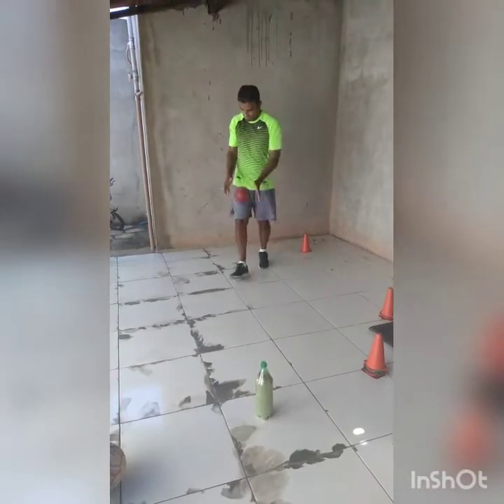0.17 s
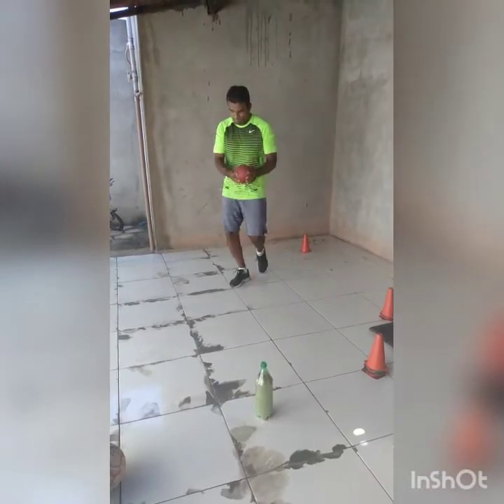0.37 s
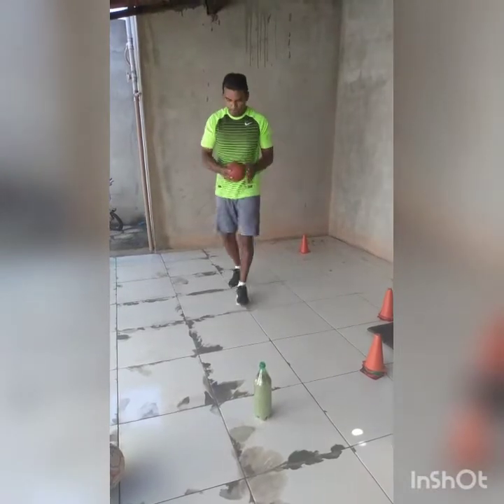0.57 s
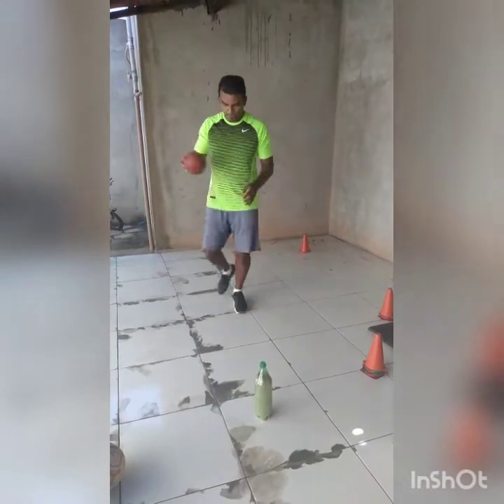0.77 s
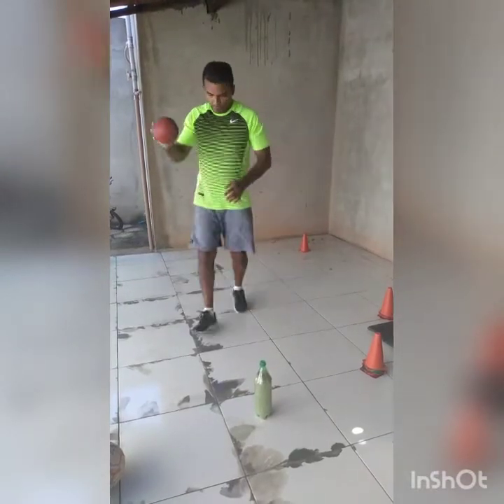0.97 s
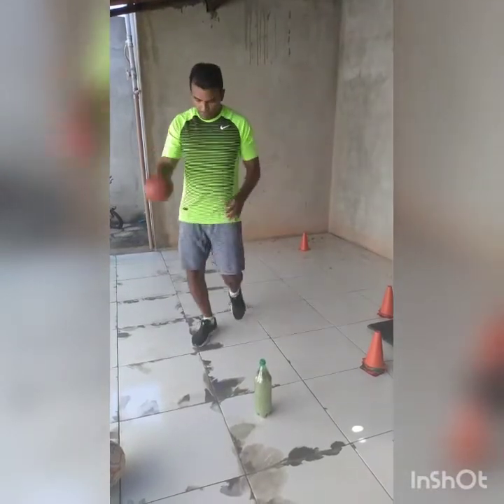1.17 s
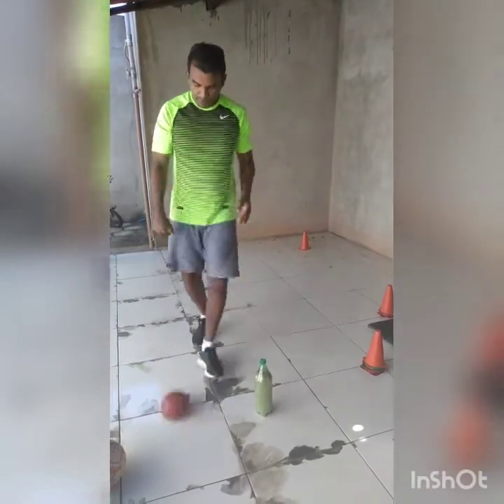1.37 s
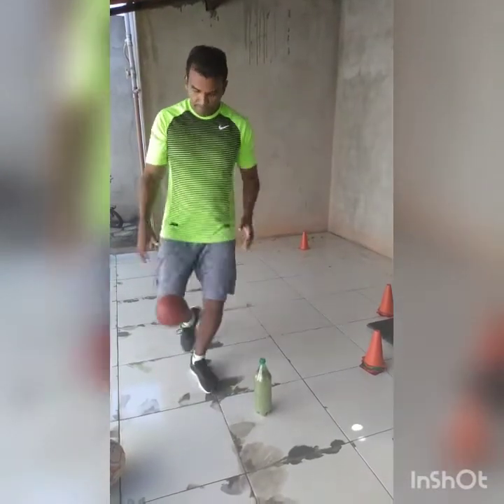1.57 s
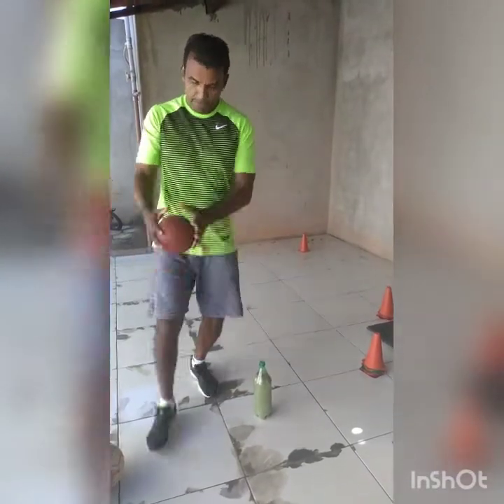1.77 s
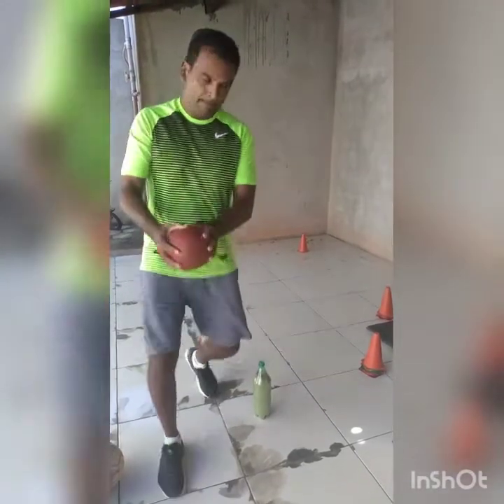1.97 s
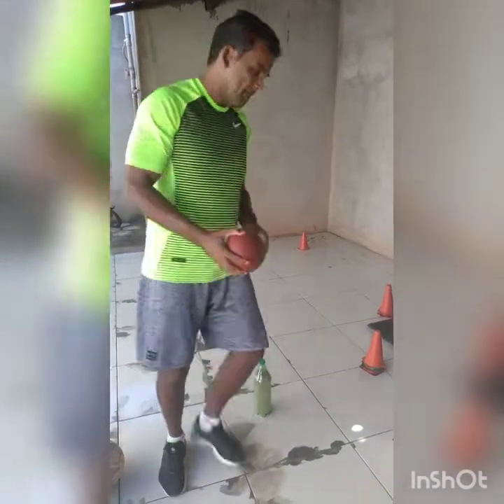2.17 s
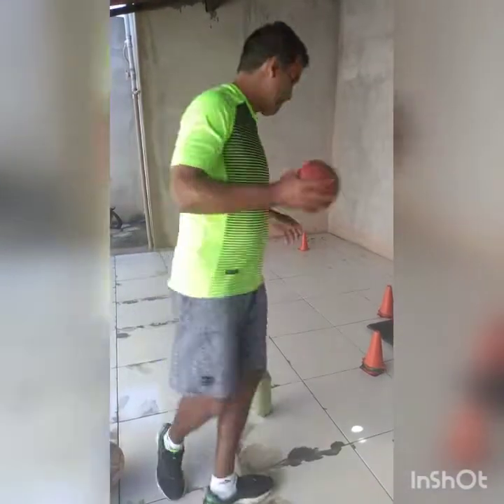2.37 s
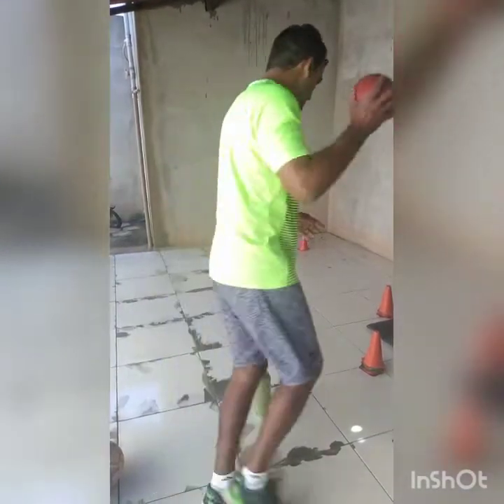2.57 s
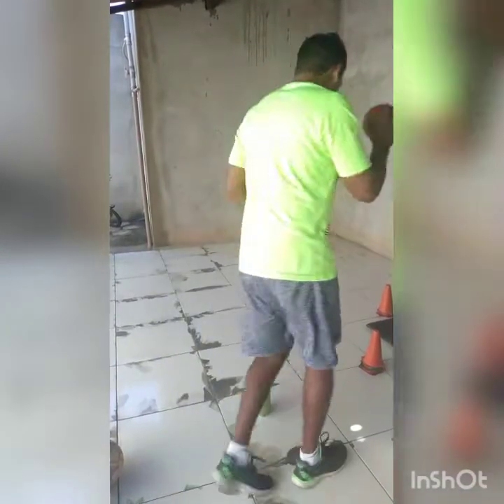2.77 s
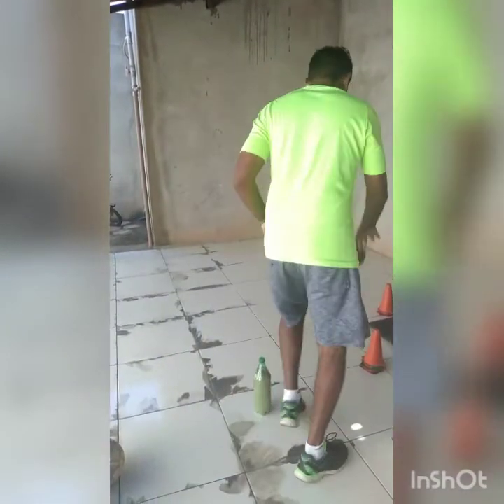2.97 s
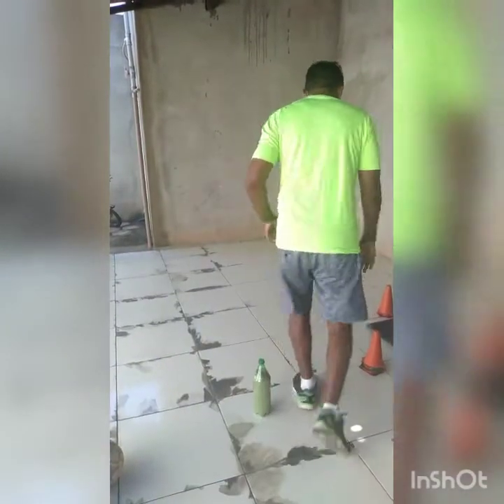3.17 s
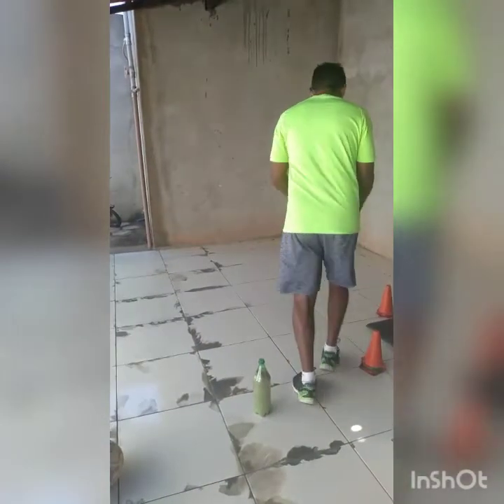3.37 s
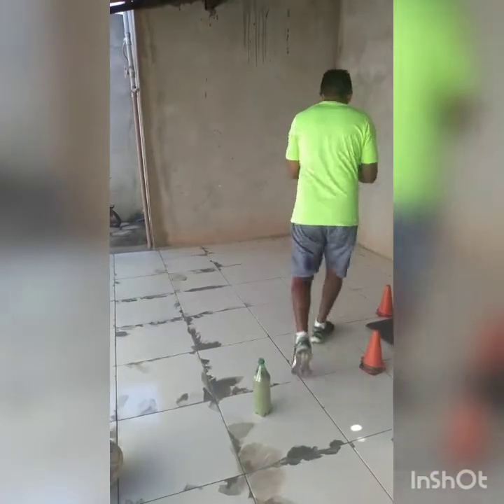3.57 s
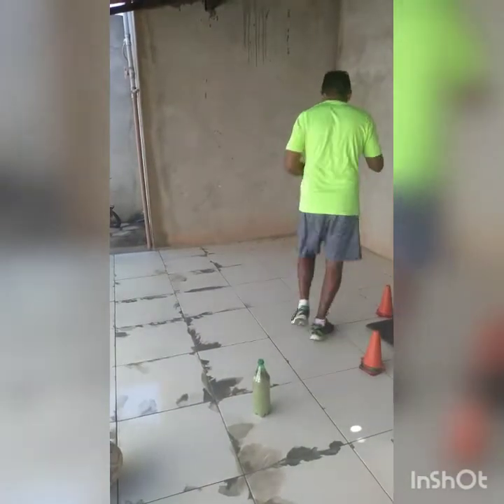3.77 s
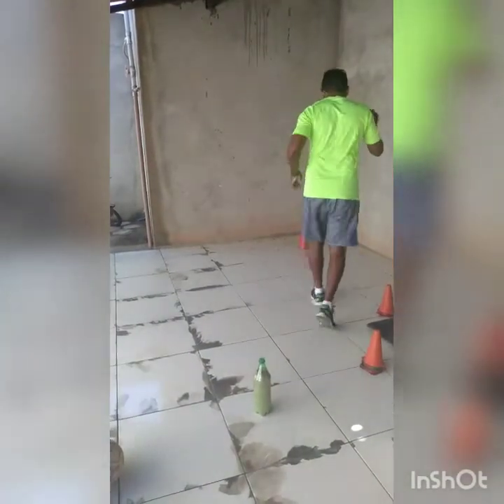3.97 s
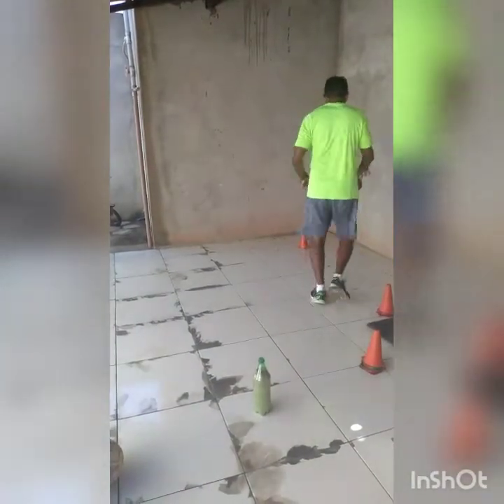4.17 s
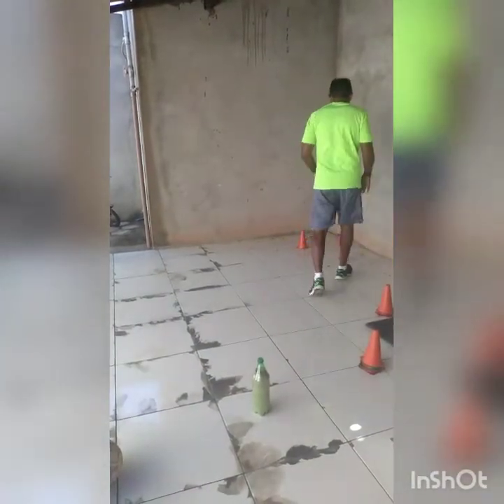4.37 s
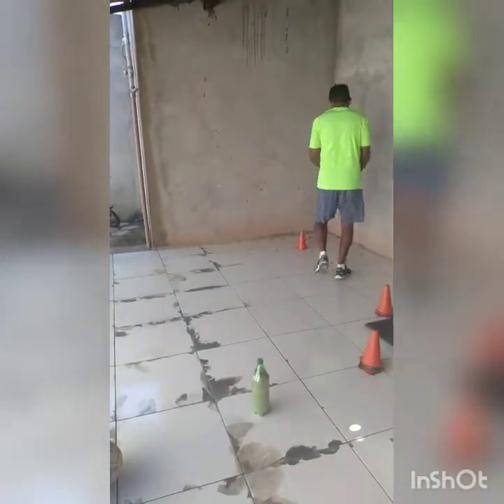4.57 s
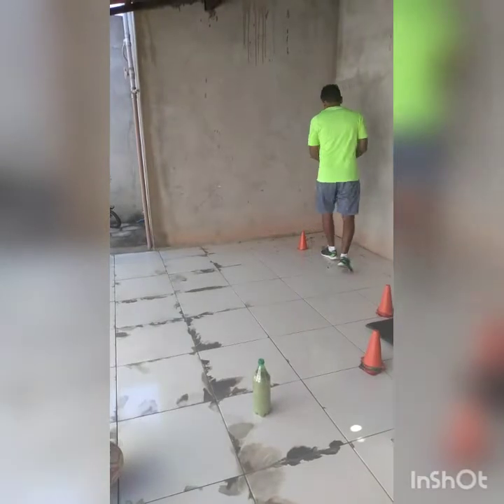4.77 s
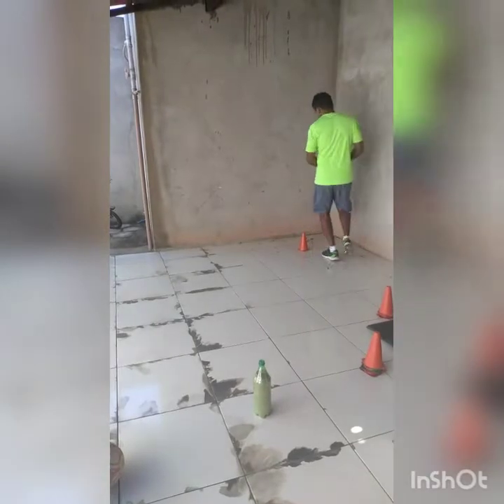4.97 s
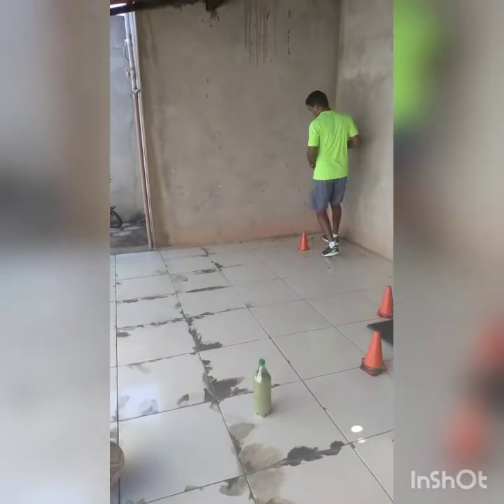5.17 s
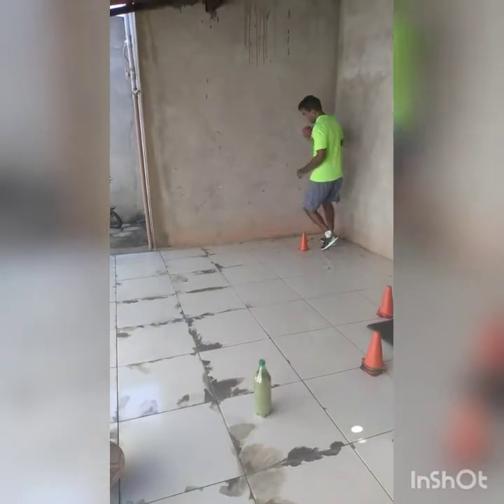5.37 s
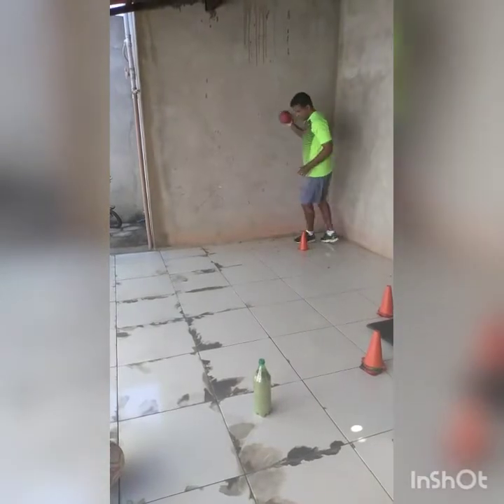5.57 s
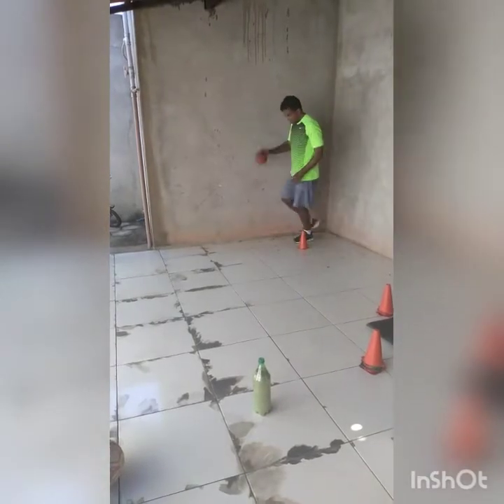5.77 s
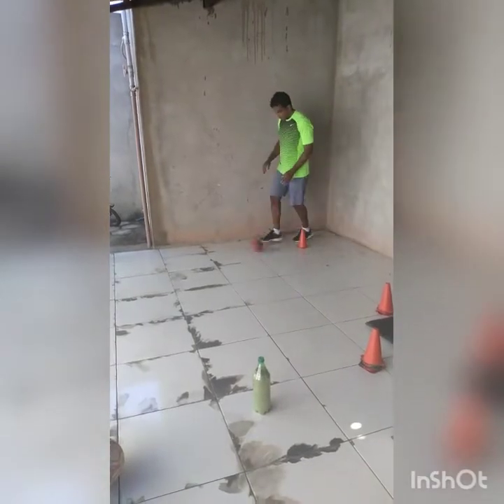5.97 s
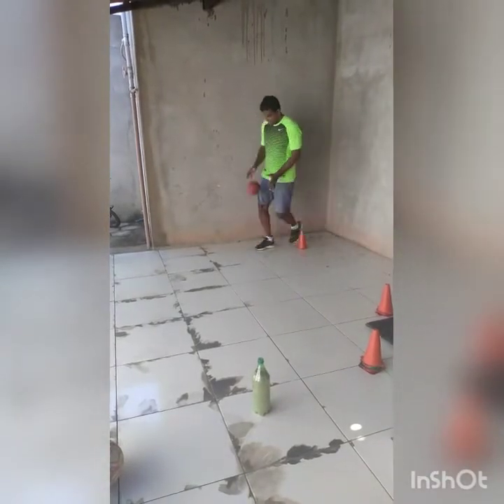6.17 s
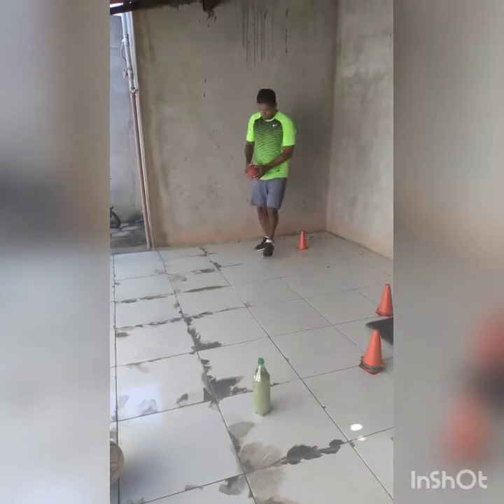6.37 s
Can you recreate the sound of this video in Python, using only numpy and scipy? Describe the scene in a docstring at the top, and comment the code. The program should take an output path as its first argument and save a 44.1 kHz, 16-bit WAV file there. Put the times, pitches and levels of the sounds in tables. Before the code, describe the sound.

A bare tiled room with hard plaster walls, heard by a stationary phone in wide stereo. At 0 s the ringing tail of a bounce just before the start dies away over faint low outdoor rumble and slight hiss. Tiny foot and hand taps come around 0.2, 0.6 and 1.0 s, then a soft scuff. At 1.4 s the ball hits loudest and close, a dull, full thud with a ringing room. Quiet steps and stuttering shoe drags follow from 1.75 to 3 s, with a faint hollow gliding tone near 2.8 s. At 3.1 s a sharper, crackly bounce; scuffs near 3.5 and 3.9 s. At 4.3 s a bounce with a strong hollow thump and bright wall echo, then shuffling and sparse steps as the player recedes. A gritty scuff at 5.6 s, a weaker, distant, reverberant bounce at 6.0 s, and small taps and scuff at 6.2 s before the end at about 6.4 s.

```python
"""A small ball bounces on a tiled floor in a bare, hard room: each hit is a dull pull, a crackle of
skin on tile and a ringing answer from the walls that grows as the player walks away.
Between bounces soles and palms tap in short uneven contacts and soles scuff as stuttering noise.
Faint hollow tones glide by over a drifting outdoor rumble. A phone listens through two ports a
hand apart and widens the picture by subtracting from each port a delayed copy of the other."""
import sys
import numpy as np
from scipy import signal
from scipy.fft import rfft, irfft, next_fast_len
from scipy.io import wavfile
from scipy.ndimage import uniform_filter1d

SR = 44100
rng = np.random.default_rng(int(sys.argv[2]) if len(sys.argv) > 2 else 0)


def master_out(mix):
    """Clip the mix to full scale and print it as 16-bit PCM to the path in sys.argv[1]."""
    frames = np.transpose(np.atleast_2d(mix))
    ceiling = np.clip(frames, -1, 1)
    pcm = np.round(ceiling * 32767).astype(np.int16)
    wavfile.write(sys.argv[1], SR, pcm)


N = 283122

# Rubber dragging on tile, as a relative spectrum. Each row: frequency in Hz, level in dB.
DRAG_SPECTRUM = [(60, -1.5), (200, 0), (500, -6), (900, 1.5), (1600, -8), (2700, -9), (5000, -25),
                 (15000, -38)]
# Fine grit and crackling skin, as a relative spectrum. Each row: frequency in Hz, level in dB.
GRIT_SPECTRUM = [(500, -32.5), (2500, 4.5), (5500, 0), (8000, -1), (11500, -1), (14000, -12)]
PORT_GAP_S = 0.000475  # sound's travel time between the ports
LEAD = SR // 2  # samples played before the start, so that earlier sounds can ring in


def bounces(mix):
    """The ball flattens in a fraction of a millisecond: a dull pull, with the crackle of its skin on the tile."""
    # Hits of the ball. Each row: start in seconds, level in dB, skin crackle in dB above that level,
    # crackle decay in ms, treble tilt of the room's share in dB per octave, bass lift in dB,
    # thump pitch in Hz, thump level in dB, wall echo delay in ms, wall echo level in dB.
    bounce_rows = [(-.13, -5, -2, 1.2, 1, -7.5, 390, -22, 18, -12),
                   (1.3859, -2.5, -2.5, 2.6, 0.5, -7.5, 421, -20, 25, -23),
                   (3.0965, -7, 9, 0.4, -0.5, -3.5, 530, -29, 15, -19),
                   (4.3006, -10, 12, 2.2, 2, -5, 455.5, -1, 24.5, 11.5),
                   (5.9813, -13, 4.5, 1.4, 0, -2, 277, -5.5, 2, 6)]
    # Tone of the ball. Each row: frequency in Hz, level in dB.
    ball_spectrum = [(30, -9), (65, 10), (150, 9), (400, 3.5), (1000, 0), (2000, 0), (3500, -6),
                     (6000, -8.5), (10000, -11), (15000, -26)]
    body_per_skin = 0.12  # a bounce that crackles more also has more body, dB per dB
    even_m = 3.58  # distance at which the room answers a bounce at 0 dB
    thump_ms_at_0m, thump_ms_per_m = 21, -0.85  # the thump comes sooner near the far wall
    lag_ms_at_1m = 0.23  # far port lag, shrinking with distance
    pull_tilt_db = -1.92  # per octave

    out = 0 * mix
    crackle_t_ms = np.arange(200) / SR * 1000
    for s, db, skin_db, crackle_ms, tilt_db, bass_db, thump_hz, thump_db, echo_ms, echo_db in bounce_rows:
        m = distance(s)
        body_db = body_per_skin * skin_db
        lag_ms = lag_ms_at_1m / m

        pull = -np.convolve(pulse(ball_spectrum, pull_tilt_db, bass_db, body_db), np.hanning(9) / 4)
        add(out, s - 12 / SR, direct(gain_of(db) * pull, lag_ms))

        sparks = rng.standard_normal(200) * np.exp(-crackle_t_ms / crackle_ms)
        crackle = np.convolve(sparks, pulse(GRIT_SPECTRUM)[:64])
        crackle /= np.linalg.norm(crackle)
        add(out, s - 16 / SR, direct(gain_of(db + skin_db) * crackle, lag_ms))

        into_room = -gain_of(db) * pulse(ball_spectrum, tilt_db, bass_db, body_db)
        walls = thump_ms_at_0m + thump_ms_per_m * m, thump_db, thump_hz, echo_ms, echo_db
        add(out, s, room(into_room, 20 * np.log10(m / even_m), walls, size=SR))
    return out


def taps(mix):
    """Each landing is a few milliseconds of uneven contact, with a thud of its own pitch."""
    # Soles and palms landing. Each row: start in seconds, level in dB, thud pitch in Hz,
    # treble tilt in dB per octave.
    tap_rows = [(0.228, -43.5, 186, -3.5), (0.29, -40.5, 184, -6.5), (0.605, -43, 292, -3),
                (0.623, -39, 750, -3.5), (1.007, -41, 210, -2.5), (1.027, -43, 910, -0.5),
                (1.036, -34.5, 740, -2), (1.759, -47.5, 511, -7), (1.839, -48, 152, -4.5),
                (1.863, -38, 530, -2), (2.207, -43, 524, -0.5), (2.298, -44, 307, -4), (2.36, -54, 900, -1),
                (2.698, -36.5, 676, 0), (2.72, -40.5, 250, -2), (2.907, -46.5, 899, -2),
                (3.005, -58, 905, -20), (3.34, -46, 323, -2.5), (3.93, -49.5, 167, -7),
                (3.957, -39.5, 453, -3), (4.635, -57, 498, -8), (4.77, -48.5, 789, -2.5),
                (5.197, -41.5, 352, -2), (5.563, -54.5, 221, -4), (5.612, -51, 840, 0.5),
                (6.228, -39, 760, -5), (6.257, -41.5, 463, -5)]
    # Tone of a landing. Each row: frequency in Hz, level in dB.
    sole_spectrum = [(40, -26.5), (100, -6), (300, -2), (1000, 3.5), (2600, 5.5), (5000, -5.5),
                     (9000, -12.5), (15000, -32.5)]
    thud_db_at_400hz, thud_db_per_octave = 7.5, -2.5  # deeper thuds stand out more
    bass_db, contact_ms = 7.5, 2.7
    tick_db, tick_tilt_db = -5.5, 3.5  # relative to the landing; tilt per octave
    room_db_at_0m, room_db_per_m = 2.03, 0.96

    out = 0 * mix
    fade = np.exp(-np.arange(600) / SR * 1000 / contact_ms)
    for s, db, thud_hz, tilt_db in tap_rows:
        thud_db = thud_db_at_400hz + thud_db_per_octave * np.log2(thud_hz / 400)
        contact = (1.06 + rng.standard_normal(600)) * fade
        contact /= np.linalg.norm(contact)
        knock = gain_of(db) * pulse(sole_spectrum, tilt_db, bass_db, thud_db, thud_hz)
        # the dry rubber tick is heard only on the straight path
        tick = gain_of(db + tick_db) * pulse(DRAG_SPECTRUM, tick_tilt_db)
        add(out, s, direct(np.convolve(knock + tick, contact)))
        add(out, s, room(knock, room_db_at_0m + room_db_per_m * distance(s)))
    return out


def scuffs(mix):
    """Stuttering friction under a smooth stroke: dull rubber drag plus fine grit."""
    # Soles dragged over the tiles. Each row: start in seconds, length in ms, rubber drag in dB rms,
    # grit hiss in dB rms (both before the path gains).
    scuff_rows = [(0.272, 36, -69, -58), (.86, 86, -64, -78), (1.161, 480, -61, -66.5),
                  (1.752, 21, -54, -61.5), (1.928, 260, -58.5, -63), (2.22, 140, -63.5, -65.5),
                  (2.611, 130, -70.5, -67.5), (2.7, 77, -50, -58), (2.819, 470, -59.5, -62),
                  (3.081, 15, -40, -67.5), (3.428, 56, -55.5, -60), (3.498, 76, -51, -88),
                  (3.93, 140, -54, -68), (4.071, 480, -61, -70), (4.617, 56, -67, -72.5),
                  (5.554, 40, -69, -56.5), (5.594, 39, -56, -50), (5.702, 290, -77, -69.5),
                  (6.22, 52, -49, -51.5)]
    rise_ms, rise_share = 12, .11  # a stroke rises for a fixed time plus a share of its length
    stutter_db = 4.6  # rms
    direct_db, room_db = -11.0, -12

    out = 0 * mix
    for s, ms, drag_db, grit_db in scuff_rows:
        u = np.linspace(0, 1, round(ms * SR / 1000))
        drag_noise, grit_noise, slow_noise = rng.standard_normal((3, SR // 2))[:, :len(u)]
        peak_at = np.clip(rise_share + rise_ms / ms, .1, .5)
        swell = np.interp(u, [0, peak_at, 1], [0, np.pi / 2, np.pi])
        stutter = gain_of(stutter_db * evened(uniform_filter1d(slow_noise, 200)))
        stroke = np.sin(swell) ** 0.24 * stutter
        drag = evened(signal.fftconvolve(drag_noise * stroke, pulse(DRAG_SPECTRUM))[:len(u)])
        grit = evened(signal.fftconvolve(grit_noise * stroke, pulse(GRIT_SPECTRUM))[:len(u)])
        rub = gain_of(drag_db) * drag + gain_of(grit_db) * grit
        add(out, s, gain_of(direct_db) * direct(rub))
        add(out, s, room(rub, room_db))
    return out


def whistles(mix, width_hz=35):
    """A wavering tone, half noise, on a gliding pitch."""
    # Faint hollow tones. Each row: start in seconds, length in ms, start pitch in Hz, end pitch in Hz,
    # level in dB (rms before the fade in and out).
    whistle_rows = [(1.755, 78, 492, 590, -69), (2.8, 240, 827, 992, -66.5), (3.62, 99, 889, 865, -70.5),
                    (5.61, 200, 850, 990, -73)]
    out = 0 * mix
    for s, ms, start_hz, end_hz, db in whistle_rows:
        hz = np.linspace(start_hz, end_hz, round(ms * SR / 1000))
        noises = rng.standard_normal((2, SR // 2))
        a, b = uniform_filter1d(noises, round(SR / width_hz))[:, :len(hz)]
        waver = evened(a) + 1j * evened(b) + 1.6  # random drift round a steady tone
        carrier = np.exp(2j * np.pi * np.cumsum(hz) / SR)
        tone = evened((waver * carrier).real) * np.hanning(len(hz)) ** 0.398
        add(out, s, direct(gain_of(db) * tone))
        add(out, s, room(gain_of(db) * tone, -5.5))
    return out


def air(mix):
    """Distant outdoor rumble drifting in through the doorway: coloured noise under a slow random-phase swell."""
    # Tone of the rumble. Each row: frequency in Hz, level in dB.
    air_spectrum = [(25, -23.5), (60, 20.5), (130, 18.5), (300, 7.5), (1000, -3.5), (1600, -6),
                    (3000, -12.5), (6000, -18), (15000, -22.5)]
    # Course of the rumble. Each row: time in seconds, level in dB rms before the swell.
    air_course = [(0, -52), (.5, -61.5), (1.1, -54.5), (2, -62), (2.6, -56.5), (3.7, -57.5), (4.2, -58),
                  (4.95, -67.5), (5.5, -59.5), (5.9, -57), (6.42, -56.5)]
    t = (np.arange(mix.shape[1]) - LEAD) / SR
    swell = 0 * t
    for f in np.geomspace(1.5, 12, 12):
        swell += np.sin(2 * np.pi * (f * t + rng.random())) / np.sqrt(f)
    level_db = np.interp(t, *np.transpose(air_course))
    rumble = evened(diffuse(rng.standard_normal(mix.shape), air_spectrum))
    return gain_of(level_db + 1.2 * evened(swell)) * rumble


def room(x, room_db, walls=None, size=SR // 2):
    """Scattered wall echoes and a tail that fills up, rings in standing waves and dies by band, fast at first."""
    # Colour of the tail. Each row: frequency in Hz, level in dB.
    wall_spectrum = [(40, 18), (300, 10), (700, 5), (2000, 4), (3000, 1.5), (6000, 6), (15000, 13)]
    # Decay of the tail by band. Each row: frequency in Hz, time in seconds to fall 60 dB.
    decay_times = [(60, 0.94), (160, 0.95), (420, 1), (1100, 0.57), (2910, 0.72), (7680, 0.46)]
    # Standing waves between the walls. Each row: frequency in Hz, level in dB before its random spread,
    # time in seconds to fall 60 dB.
    standing_waves = [(66.1, -40, 1.2), (153.1, -40.5, 0.53), (280.5, -41.5, 0.52), (365, -47, 0.6),
                      (432.7, -50.5, 0.69), (480, -50.5, 0.97), (530, -50.5, 0.85), (572.4, -52, 0.48)]
    ring_db, ring_span = 6, 0.19  # lift of standing waves near the thump, and its relative width

    hz, t, z = signal.stft(rng.standard_normal((2, size)), SR, nperseg=256)
    early = 1 + gain_of(-7.5) * np.exp(-t / 0.077)
    fall = gain_of(-60 * t / read(decay_times, hz)[:, None]) * early
    tail = signal.istft(z * fall, SR, nperseg=256)[1][:, :size]
    tail = diffuse(tail / np.linalg.norm(tail[0]), wall_spectrum)

    t = np.arange(size) / SR
    draws = rng.standard_normal((len(standing_waves), 3))
    for (f, db, t60), (spread, phase, split) in zip(standing_waves, draws):
        beating = 1 + 0.37 * np.sin(2 * np.pi * (7.24 * split * t + spread))  # a close neighbour beats with each
        wave_db = db + 2 * spread  # each standing wave randomly stronger or weaker for every sound
        if walls:  # waves near the pitch of the thump ring on
            wave_db += ring_db * np.exp(-(np.log(f / walls[2]) / ring_span) ** 2)
        wave = np.sin(2 * np.pi * (f * t + phase + np.c_[[0, f * PORT_GAP_S]]))
        tail += gain_of(wave_db - 60 * t / t60) * beating * wave

    paths = gain_of(room_db) * tail * (1 - np.exp(-(t / 0.0034) ** 2))
    paths *= np.sqrt(1 - t / t[-1]) * (t < .9 * t[-1])
    if walls:
        thump_ms, thump_db, thump_hz, echo_ms, echo_db = walls
        # evenly spaced low reflections pile up into a short hollow note
        reflections = np.exp(1.4 * np.sin(2 * np.pi * (thump_hz * t + rng.random()))) - 1.55
        thump = np.exp(-((t * 1000 - thump_ms) / 4.7) ** 2) * reflections
        paths += gain_of(thump_db) * thump / np.linalg.norm(thump)
        # rough plaster smears the strongest, bright echo over a few milliseconds
        smear = np.exp(-((t[:2048] * 1000 - echo_ms) / 3.5) ** 2)
        echo = np.diff(rng.standard_normal((2, 2049))) * smear
        paths[:, :2048] += gain_of(echo_db) * echo / np.linalg.norm(echo[0])
    return signal.fftconvolve(x[None], paths, axes=1)


def direct(x, lag_ms=0.055):
    """The straight path, reaching the far port a little later."""
    at = np.arange(48) - 8 - SR / 1000 * np.c_[[0, lag_ms]]
    return signal.fftconvolve(x[None], np.sinc(at) * np.exp(-(at / 6) ** 2), axes=1)


def distance(s):
    """Metres from the phone to the player at time s."""
    # The player's walk. Each row: time in seconds, distance in metres.
    walk = [(0, 3.34), (1.4, 1.87), (2.3, 1.3), (3.1, 1.86), (4.3, 3.18), (5.2, 4.8), (6.42, 7.4)]
    return np.interp(s, *np.transpose(walk))


def pulse(spectrum, tilt_db=0., bass_db=0., body_db=0., body_hz=520):
    """The causal click that has this spectrum, with treble, bass and body set for one blow; peak 1."""
    hz = abs(np.fft.fftfreq(8192, 1 / SR))
    db = read(spectrum, hz) + tilt_db * np.log2(np.maximum(hz, 500) / 1000)
    db += bass_db / (1 + (hz / 220) ** 2)
    db += body_db * np.exp(-np.log((hz + 1) / body_hz) ** 2 / 0.029)
    # minimum phase packs the energy to the front
    click = np.fft.ifft(np.exp(np.conj(signal.hilbert(np.log(gain_of(db)))))).real[:4096]
    return click / abs(click).max()


def diffuse(pair, spectrum):
    """Colours two noises and makes them alike in the bass, as sound from all sides is at close ports."""
    a, b = rfft(pair)
    hz = np.fft.rfftfreq(pair.shape[1], 1 / SR)
    same = .95 * np.sinc(2 * hz * PORT_GAP_S)
    ports = np.array([a, same * a + np.sqrt(1 - same ** 2) * b])
    return irfft(gain_of(read(spectrum, hz)) * ports, pair.shape[1])


def gain_of(db):
    """Decibels to gain."""
    return 10 ** (np.asarray(db) / 20)


def evened(x):
    """Scales to rms 1."""
    return x / np.sqrt(np.mean(x ** 2) + 1e-20)


def read(points, hz):
    """Reads a table along log frequency."""
    f, value = np.transpose(points)
    return np.interp(np.log(hz + 1), np.log(f + 1), value)


def add(mix, s, sound):
    """Mixes a two-port sound in at time s."""
    part = mix[:, LEAD + round(s * SR):][:, :sound.shape[1]]
    part += sound[:, :part.shape[1]]


def scene():
    """Pressure at the two ports."""
    mix = np.zeros((2, LEAD + N))
    return (bounces(mix) + taps(mix) + scuffs(mix) + whistles(mix) + air(mix))[:, LEAD:]


def record(dry):
    """Shading of the far port, capsule hiss, cross subtraction, band limit."""
    # Far port shaded by the phone. Each row: frequency in Hz, gain in dB.
    far_shading = [(30, -3), (200, -4.5), (600, -5.5), (4000, -4), (6000, 0.5), (9000, -13.5),
                   (14000, -8.5)]
    # Tone of the capsule hiss. Each row: frequency in Hz, level in dB.
    hiss_spectrum = [(500, 9.5), (4000, -7), (9000, -10.5), (12000, -9.5), (14500, -29.5)]
    # Share subtracted across. Each row: frequency in Hz, gain in dB.
    cross_share = [(30, -2.5), (4300, -2), (6500, -4), (9000, -12), (14000, -25)]
    hiss_db, edge_hz = -73, 14350  # hiss rms ahead of the subtraction; upper band edge

    size = next_fast_len(N + SR)
    hz = np.fft.rfftfreq(size, 1 / SR)
    near, far = rfft(dry, size)
    far = far * gain_of(read(far_shading, hz))
    hiss = irfft(rfft(rng.standard_normal((2, size))) * gain_of(read(hiss_spectrum, hz)), size)
    near, far = [near, far] + rfft(gain_of(hiss_db) * evened(hiss))
    across = gain_of(read(cross_share, hz)) * np.exp(-2j * np.pi * hz * PORT_GAP_S)
    wide = irfft([near - across * far, far - across * near], size)[:, :N]
    band = signal.firwin(511, edge_hz, window=("kaiser", 8), fs=SR)
    return signal.oaconvolve(wide, band[None], "same")


dry = scene()
out = record(dry)
master_out(out)
```